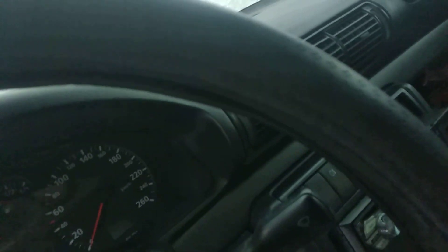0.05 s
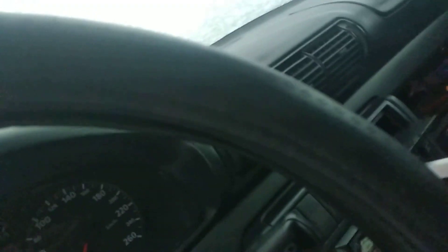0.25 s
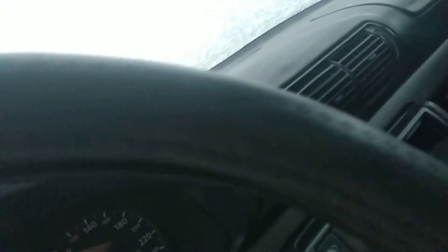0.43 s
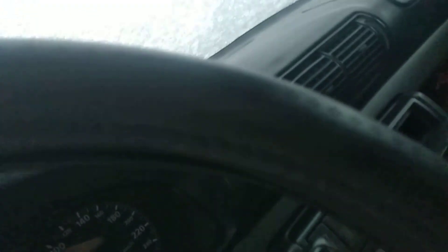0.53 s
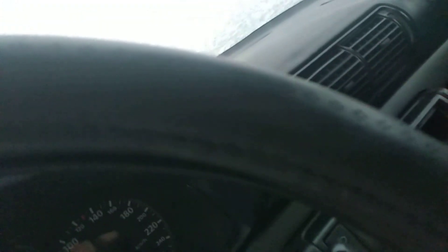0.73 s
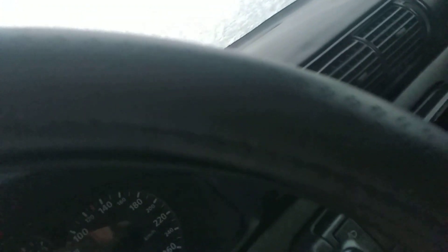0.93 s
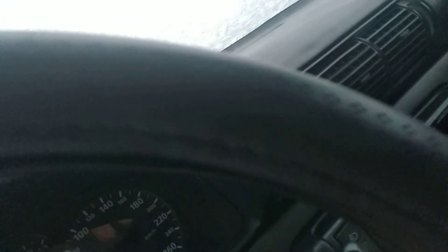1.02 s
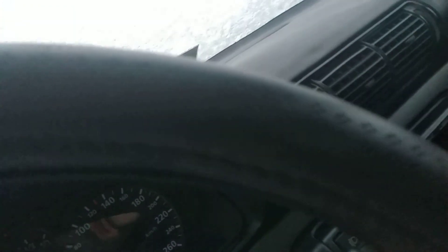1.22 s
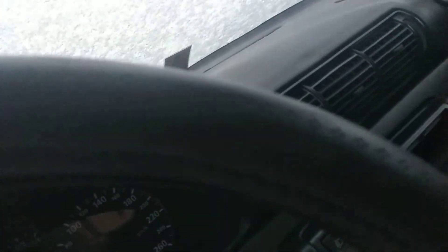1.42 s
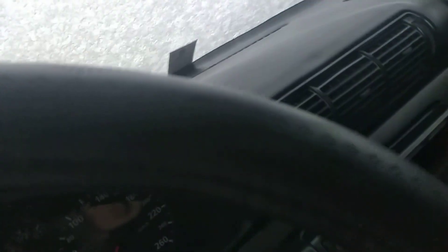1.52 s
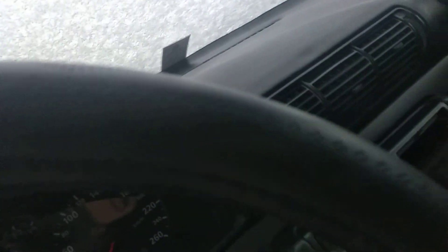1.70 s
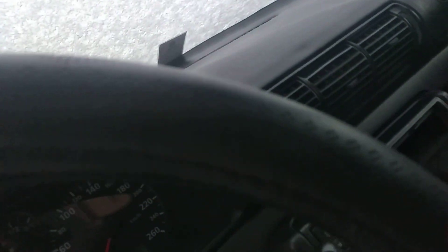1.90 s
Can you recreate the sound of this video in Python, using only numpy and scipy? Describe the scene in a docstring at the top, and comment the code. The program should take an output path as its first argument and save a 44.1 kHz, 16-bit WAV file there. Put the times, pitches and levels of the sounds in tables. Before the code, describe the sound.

Short, irregular rustles and light plastic clicks of things handled inside a parked car.

```python
"""Inside a parked car, things are handled close to a hand-held microphone.
Each rub is a burst of tiny stick-slips that hiss and rasp; firmer rubs also sound a hollow plastic body,
and a few squeak. Something padded slides, the grip rumbles, bumps ring the case and plastic parts tap.
The small padded cabin adds a short tail over a faint noise floor."""
import sys
import numpy as np
from scipy import signal
from scipy.fft import rfft, irfft
from scipy.io import wavfile
from scipy.ndimage import uniform_filter1d, map_coordinates

SR = 44100
rng = np.random.default_rng(int(sys.argv[2]) if len(sys.argv) > 2 else 0)


def materialize(psi):
    """Save the field psi as 16-bit PCM at rate SR to the path in sys.argv[1].

    A 1-D psi becomes a single channel; in a 2-D psi each row is a channel.
    """
    bounded = np.clip(np.atleast_2d(psi).T, -1, 1)
    quanta = np.round(bounded * 32767).astype(np.int16)
    wavfile.write(sys.argv[1], SR, quanta)


N = 85995
TIME_S = np.arange(N) / SR
SOFT_ATTACK_S, SOFT_RELEASE_S = 0.036, 0.015
RUB_ATTACK_S, RUB_RELEASE_S = 0.012, 0.0072


def undb(db):
    """Decibels to gain."""
    return 10 ** (np.asarray(db) / 20)


def unit(x):
    """Each channel scaled to rms 1."""
    return x / np.sqrt(np.mean(x ** 2, axis=-1, keepdims=True))


def colour(x, spectrum):
    """Filter by (freq_hz, gain_db) points, steep cut below the first; rms 1."""
    hz, db = np.array(spectrum).T
    freq_hz = np.maximum(np.fft.rfftfreq(N, 1 / SR), 1)
    gain_db = np.interp(np.log(freq_hz), np.log(hz), db)
    cut_db = 60 * np.maximum(np.log(hz[0] / freq_hz), 0)
    return unit(irfft(rfft(x) * undb(gain_db - cut_db), N))


def low_cut(x, hz):
    """Third-order high-pass."""
    return signal.sosfilt(signal.butter(3, hz, "high", fs=SR, output="sos"), x)


def band(x, low_hz, high_hz):
    """Band-pass; rms 1."""
    return unit(signal.sosfilt(signal.butter(2, [low_hz, high_hz], "band", fs=SR, output="sos"), x))


def pan(left_db):
    """Stereo gains, left over right by left_db decibels."""
    return undb(np.array([[1], [-1]]) * left_db / 2) / np.sqrt(np.cosh(left_db * np.log(10) / 10))


def stroke(start_s, length_s, attack_s, release_s):
    """Envelope: rounded attack, hold, exponential release."""
    t = TIME_S - start_s
    return (0.5 + 0.5 * np.tanh(2 * t / attack_s - 0.5)) * np.exp(-np.maximum(t - length_s, 0) / release_s)


def ring(start_s, modes):
    """Damped modes struck together."""
    t = np.maximum(TIME_S - start_s, 0)
    return sum(undb(db) * np.sin(2 * np.pi * hz * t) * 1000 ** (-t / t60_s) for hz, db, t60_s in modes)


def slips(per_s):
    """Stick-slip impulses, random in time and sign."""
    return (rng.random(N) < per_s / SR) * rng.choice([-1, 1], N)


def wander(x, depth_db=3.5, width_hz=260, life_s=0.035):
    """Surface resonances change as the contact moves."""
    freq_hz, time_s, spectrum = signal.stft(x, SR, nperseg=512)
    grid = np.meshgrid(freq_hz / width_hz, time_s / life_s, indexing="ij")
    fields = rng.standard_normal((3, 128, 128))
    both, left, right = (map_coordinates(field, grid, mode="mirror") for field in fields)
    gain_db = depth_db * (both + np.array([left, right])) / np.sqrt(2)
    return signal.istft(spectrum * undb(gain_db), SR)[1][:, :N]


def friction(decay_s=0.00042, mono_share=0.18):
    """Dense stick-slips, each a tiny dying noise burst."""
    energy = signal.lfilter([1], [1, -np.exp(-2 / (decay_s * SR))], slips(per_s=3800) ** 2)
    noise = mono_share * rng.standard_normal(N) + (1 - mono_share) * rng.standard_normal((2, N))
    return wander(np.sqrt(energy) * noise)


# Floor spectrum: freq_hz, gain_db
FLOOR_SPECTRUM = [(40, 2), (90, -0.5), (250, -11), (700, -10.5), (1500, -16.5), (5000, -19), (8000, -11.5),
                  (15500, -25.5)]


def noise_floor(level_db=-61.5):
    """Faint, steady, bass-heavy noise."""
    return undb(level_db) * colour(rng.standard_normal((2, N)), FLOOR_SPECTRUM)


def cabin_tail(x, t60_s=0.065, gain_db=-2.5):
    """Dense, short reflections of the padded cabin, different in each channel."""
    t = np.arange(SR // 4) / SR
    decay = rng.standard_normal((2, len(t))) * 1000 ** (-t / t60_s)
    response = unit(decay) / np.sqrt(len(t))
    return undb(gain_db) * signal.fftconvolve(low_cut(x, hz=266), response, axes=1)[:, :N]


# Padded slides: start_s, length_s, level_db
PADDED_SLIDES = [(0.213, 0.12, -57.5), (0.347, 0.154, -63), (0.513, 0.152, -55.5), (0.69, 0.25, -60.5)]
# Slide spectrum: freq_hz, gain_db
SLIDE_SPECTRUM = [(120, -14), (190, 2), (300, 0), (450, -12.5), (660, 0), (850, -12), (1500, -10),
                  (3000, -17.5)]


def slides():
    """Something padded brushes dully under the early rubs."""
    envelope = sum(undb(db) * stroke(start_s, length_s, SOFT_ATTACK_S, SOFT_RELEASE_S)
                   for start_s, length_s, db in PADDED_SLIDES)
    noise = rng.standard_normal(N) + rng.standard_normal((2, N)) / 2
    return envelope * colour(noise, SLIDE_SPECTRUM)


# Grip shifts: start_s, length_s, level_db, centre_hz
GRIP_SHIFTS = [(.002, 0.0077, -53.5, 84), (0.167, 0.014, -53, 189), (0.263, 0.087, -67, 122),
               (0.972, 0.068, -49.5, 202), (1.133, 0.012, -54, 97), (1.149, 0.021, -57, 293),
               (1.221, 0.045, -44.5, 194), (1.4, 0.047, -53, 127), (1.462, 0.12, -57, 180),
               (1.588, 0.042, -54.5, 110), (1.646, 0.039, -43.5, 193), (1.729, 0.047, -48.5, 213),
               (1.8, 0.056, -59.5, 128), (1.84, 0.11, -63, 138)]


def grip(slips_per_s=2400, edge_ratio=1.43, hollow_db=-7):
    """Slips of the hand rumble through the case and ring its hollow; mono."""
    hollow = undb(hollow_db) * band(slips(slips_per_s), low_hz=338.5, high_hz=448.5)
    out = 0
    for start_s, length_s, db, centre_hz in GRIP_SHIFTS:
        rumble = band(slips(slips_per_s), centre_hz / edge_ratio, centre_hz * edge_ratio)
        out += undb(db) * (rumble + hollow) * stroke(start_s, length_s, SOFT_ATTACK_S, SOFT_RELEASE_S)
    return out


# Blows on the case: start_s, gain_db, contact_s
CASE_BUMPS = [(0.658, -53, 0.00083), (0.986, -29, .005), (0.996, -26, 0.0018), (1.014, -42, 0.0018),
              (1.240, -43.5, 0.0028), (1.257, -62, 0.006), (1.488, -47.5, .001), (1.534, -55, 0.00055),
              (1.578, -45.5, 0.00051), (1.648, -41.5, .001), (1.669, -38.5, 0.0016), (1.692, -38, 0.0013),
              (1.738, -43, 0.00075)]
# Modes of the case and its support: freq_hz, gain_db, t60_s
BUMP_MODES = [(81.3, -13, 0.35), (109, -11.5, 0.23), (146.3, -4.5, 0.27), (205.3, -9, 0.283),
              (275, -32, 0.23), (317.4, -5.5, 0.13), (402, 2.5, 0.056)]


def bumps():
    """Soft blows ring the low modes; longer contact is duller."""
    return sum(undb(db) * uniform_filter1d(ring(start_s, BUMP_MODES), int(contact_s * SR))
               for start_s, db, contact_s in CASE_BUMPS)


# Light taps: start_s, level_db, pitch_hz
PLASTIC_TAPS = [(.127, -39.5, 2120), (.2595, -34, 668), (0.397, -40.5, 1190), (0.556, -33.5, 1097),
                (.555, -30, 2633), (.993, -29, 1094), (1.022, -40, 1304), (1.231, -33.5, 1059),
                (1.258, -39.5, 854), (1.446, -37, 1083), (1.484, -35, 1290), (1.534, -38.5, 1546),
                (1.574, -38, 925), (1.647, -27, 786), (1.667, -33, 1220)]
# Modes of a tapped part: pitch_ratio, gain_db, t60_s
PLASTIC_MODES = [(1, -0.5, 0.026), (.87, -13, 0.031), (1.17, -8.5, 0.028), (1.95, -7, 0.019)]


def taps(crack_db=-19.5, crack_decay_s=0.0046):
    """Small plastic parts knock with a dry crack and ring briefly."""
    knocks = contact = 0
    for start_s, db, pitch_hz in PLASTIC_TAPS:
        modes = [(pitch_hz * ratio, gain_db, t60_s) for ratio, gain_db, t60_s in PLASTIC_MODES]
        knocks += undb(db) * ring(start_s, modes)
        contact += undb(db) * (TIME_S >= start_s) * np.exp(-np.abs(TIME_S - start_s) / crack_decay_s)
    crack = undb(crack_db) * contact * band(rng.standard_normal((2, N)), low_hz=463, high_hz=2960)
    return low_cut(knocks, hz=230) + crack


# Squeaking slides: start_s, length_s, level_db, pitch_hz
SQUEAK_STROKES = [(0.074, 0.089, -50.5, 3830), (0.358, 0.056, -45.5, 2315), (0.554, 0.014, -32.5, 2680),
                  (1.211, 0.041, -46.5, 2634)]


def squeaks(width_hz=360):
    """Slips catch in one narrow resonance."""
    grain, out = friction(), 0
    for start_s, length_s, db, pitch_hz in SQUEAK_STROKES:
        resonance = band(grain, pitch_hz - width_hz / 2, pitch_hz + width_hz / 2)
        out += undb(db) * resonance * stroke(start_s, length_s, RUB_ATTACK_S, RUB_RELEASE_S)
    return pan(left_db=4) * out


# Rubs: start_s, length_s, hiss_db, rasp_db, body_db, sheen_db
RUB_STROKES = [ (0.075, 0.014, -38, -63, -86, -41), (0.101, 0.0062, -32, -51, -54, -36.5),
               (.123, 0.0064, -34, -42.5, -71, -51), (0.134, 0.059, -50.5, -58, -66, -50.5),
               (0.2, 0.02, -29.5, -44, -57, -33.5), (0.217, 0.13, -50, -57, -57.5, -55),
               (0.334, 0.019, -31, -44, -65, -34), (0.361, 0.04, -34, -46, -56.5, -33.5),
               (0.398, 0.035, -35, -52, -57.5, -44), (0.43, 0.052, -48.5, -60.5, -58, -54),
               (0.501, 0.016, -33.5, -51, -53.5, -30.5), (0.52, 0.016, -59, -41, -54.5, -57),
               (0.544, 0.0078, -16.5, -23, -71, -24.5), (0.55, 0.016, -26, -27, -72, -39),
               (0.56, 0.019, -22.5, -35, -59, -24), (0.601, 0.012, -36.5, -49, -52, -42),
               (0.655, 0.012, -47, -78, -60.5, -64), (0.738, 0.014, -39, -54.5, -52.5, -38),
               (0.76, 0.034, -45, -60.5, -60, -47.5), (0.808, 0.0064, -36, -51.5, -58, -46),
               (0.82, 0.093, -61.5, -62.5, -60, -68), (0.924, 0.0092, -37, -49.5, -54, -44),
               (0.953, 0.0046, -32.5, -39.5, -46, -45), (0.972, 0.0056, -33, -37.5, -42.5, -37),
               (0.98, 0.027, -39, -43.5, -40.5, -39.5), (1.02, 0.0045, -49, -45, -41, -52),
               (1.046, 0.019, -80, -60, -58, -74), (1.088, 0.0066, -52, -57, -57.5, -53),
               (1.137, 0.014, -64, -50.5, -59, -56), (1.154, 0.034, -59, -58.5, -69, -54),
               (1.186, 0.054, -46, -47.5, -54.5, -41.5), (1.215, 0.022, -39, -42.5, -41, -49.5),
               (1.238, 0.021, -42.5, -47, -41, -72), (1.31, 0.028, -49.5, -57, -54, -74),
               (1.379, 0.0059, -35.5, -49, -59, -37.5), (1.4, 0.027, -31, -46, -58, -40),
               (1.441, 0.006, -25, -31, -36.5, -28), (1.454, 0.0078, -33, -41, -65, -53),
               (1.482, .012, -41, -40, -40, -43), (1.503, 0.0063, -27, -37.5, -89, -41),
               (1.527, 0.0064, -43, -41.5, -36.5, -64), (1.568, 0.0089, -29.5, -43.5, -39.5, -24),
               (1.602, 0.037, -37, -48.5, -63, -60), (1.627, 0.0056, -37, -36, -64, -34),
               (1.64, 0.014, -26, -29.5, -38.5, -29.5), (1.657, 0.012, -24, -34.5, -30.5, -26),
               (1.67, 0.025, -31.5, -46, -70, -55), (1.712, 0.0085, -36, -44, -85, -32.5),
               (1.727, 0.0034, -44, -44.5, -41.5, -52), (1.749, 0.047, -46, -65, -93, -54),
               (1.781, 0.012, -38.5, -43.5, -53.5, -53), (1.821, 0.028, -50, -53.5, -59, -58),
               (1.851, 0.019, -39.5, -54, -76, -49), (1.878, 0.074, -53.5, -54.5, -67, -54.5),
               (1.92, 0.0077, -31.5, -53, -57, -40), (1.937, 0.018, -45, -59, -50, -48)]
# Spectra of the four parts of a rub: freq_hz, gain_db
HISS_SPECTRUM = [(4500, -24), (6000, -13), (7300, -1), (8200, 1.5), (9400, 0.5), (10300, -9), (11500, -40),
                 (14000, -87)]
RASP_SPECTRUM = [(1200, -23), (1800, -1.5), (2300, 2.5), (2750, -0.5), (3200, 1.5), (4200, -0.5),
                 (5400, -4.5), (6200, -5.5), (7500, -11.5)]
BODY_SPECTRUM = [(150, -46), (280, -7.5), (400, 4.5), (520, -0.5), (650, -4.5), (820, 2.5), (1200, 2),
                 (1600, -6), (2600, -25.5)]
SHEEN_SPECTRUM = [(8000, -35), (10000, -6.5), (10900, 4.5), (12100, -1), (13500, -1), (14800, -3.5),
                  (16000, -9.5)]


def rubs(early_left_db=4, drift_s=0.73):
    """One stream of slips sounds as hiss, rasp, hollow body and top sheen, mixed per rub."""
    grain = friction()
    envelopes = np.array([stroke(start_s, length_s, RUB_ATTACK_S, RUB_RELEASE_S)
                          for start_s, length_s, *_ in RUB_STROKES])
    gains = undb(np.array(RUB_STROKES)[:, 2:].T)
    hiss, rasp, body, sheen = np.sqrt(gains ** 2 @ envelopes ** 2)  # overlaps add in power
    drift_db = early_left_db * np.maximum(1 - TIME_S / drift_s, 0)  # treble starts further left
    return (hiss * colour(grain, HISS_SPECTRUM) * pan(left_db=4.5 + drift_db)
            + rasp * colour(grain, RASP_SPECTRUM) * pan(left_db=0.8 + drift_db)
            + body * colour(grain, BODY_SPECTRUM) * pan(left_db=-8.5)
            + sheen * colour(grain, SHEEN_SPECTRUM) * pan(left_db=6 + drift_db))


def scene():
    """Noise floor, cabin tail and close handling."""
    handling = slides() + grip() + bumps() + taps() + squeaks() + rubs()
    return noise_floor() + cabin_tail(handling) + handling


def record(dry, bottom_hz=47, top_hz=15900):
    """The recorder cuts the deepest bass and the top."""
    low_pass = signal.ellip(10, 0.2, 80, top_hz, fs=SR, output="sos")
    return signal.sosfilt(low_pass, low_cut(dry, bottom_hz))


dry = scene()
out = record(dry)
materialize(out)
```